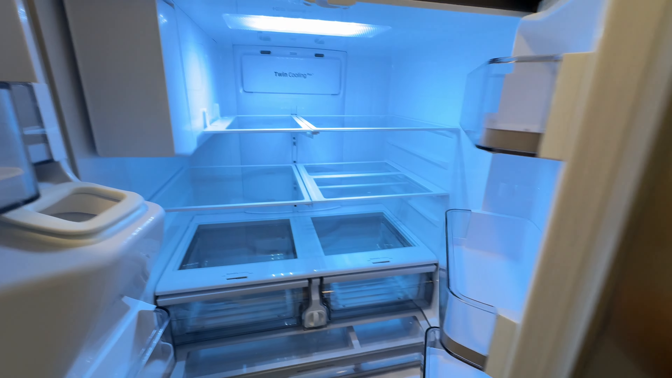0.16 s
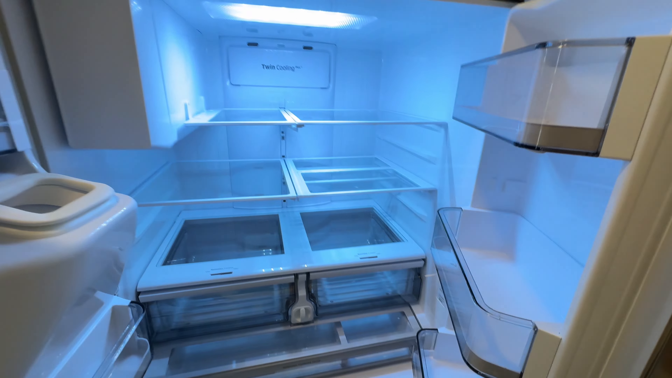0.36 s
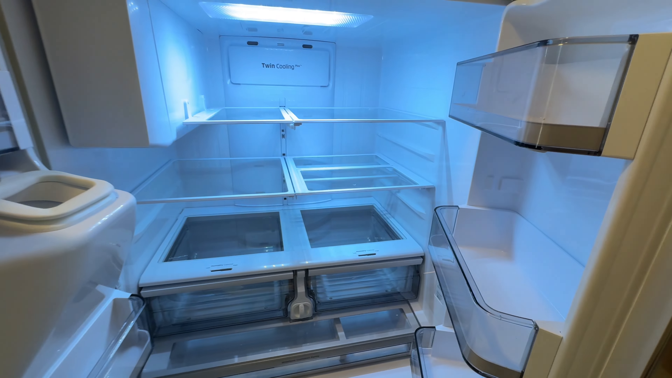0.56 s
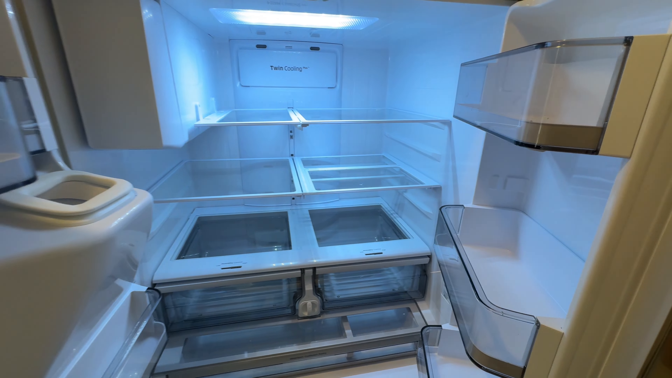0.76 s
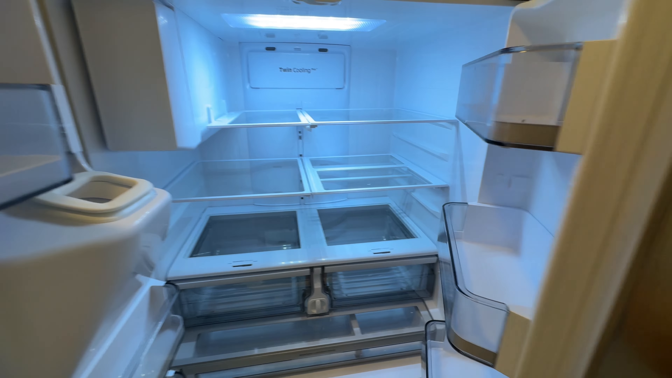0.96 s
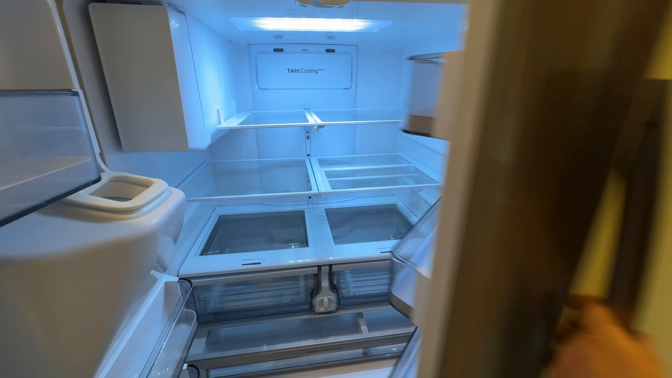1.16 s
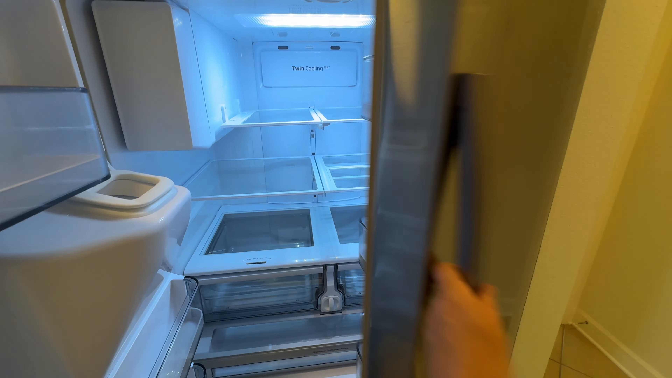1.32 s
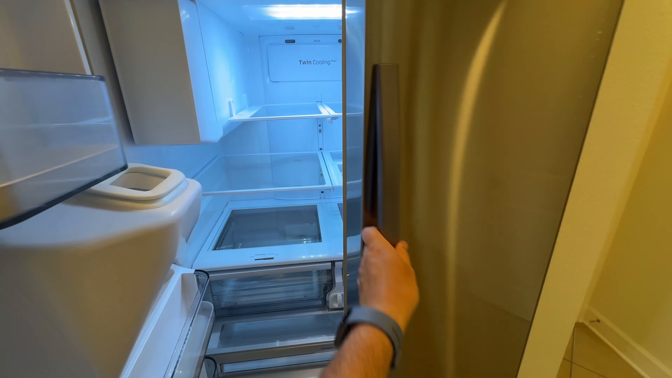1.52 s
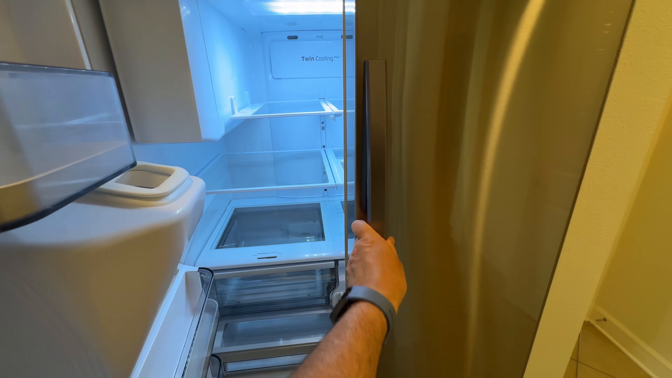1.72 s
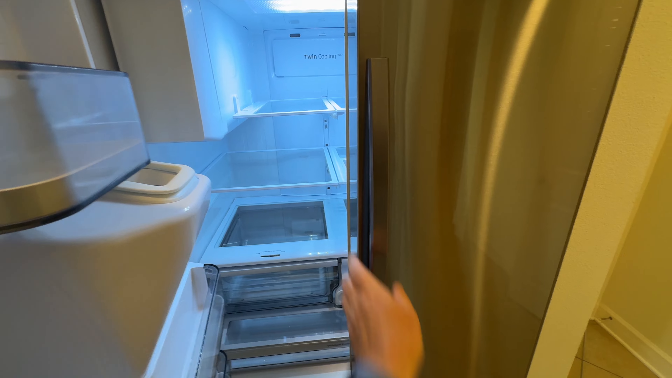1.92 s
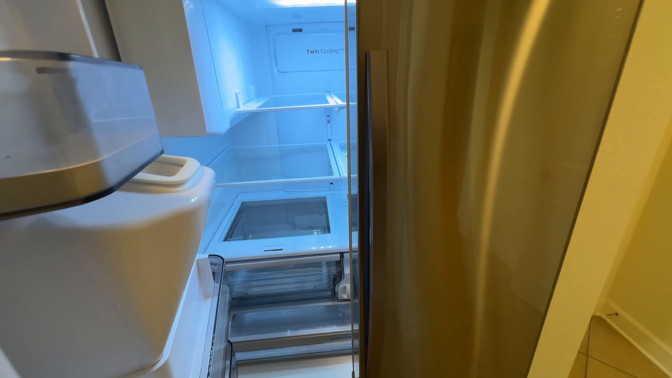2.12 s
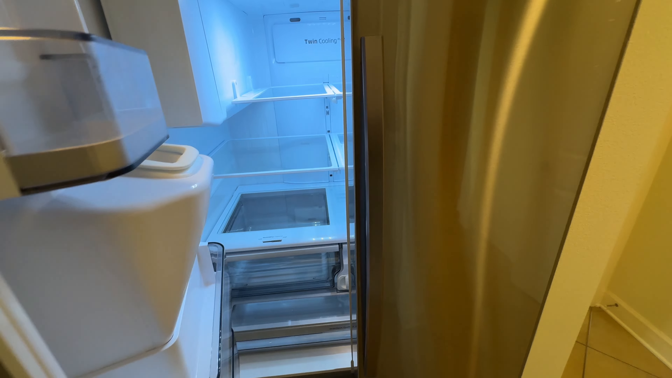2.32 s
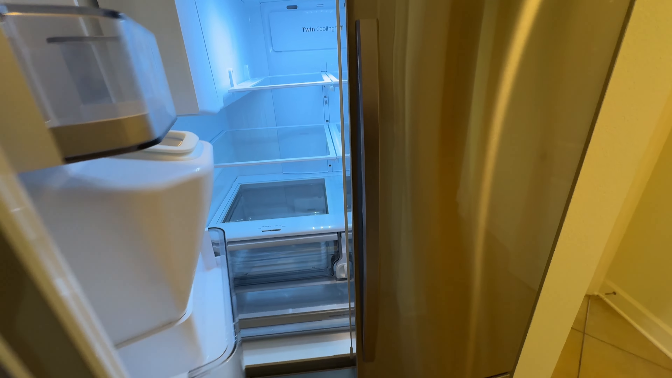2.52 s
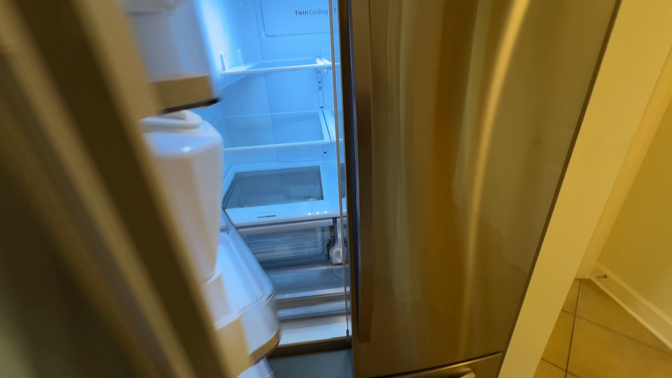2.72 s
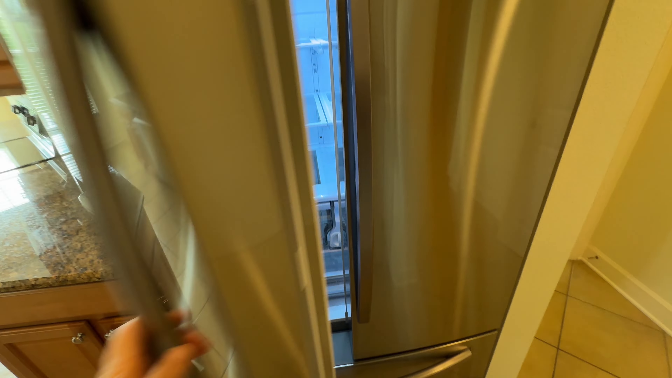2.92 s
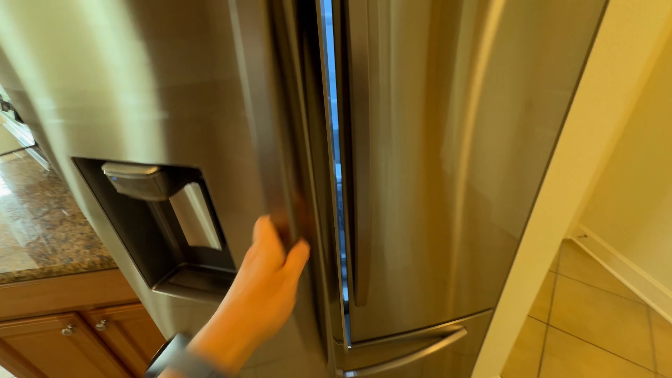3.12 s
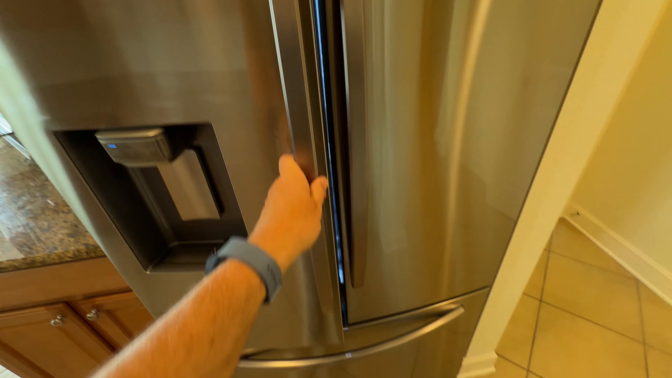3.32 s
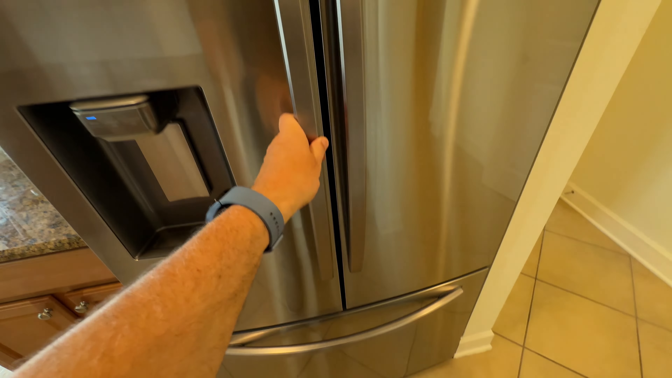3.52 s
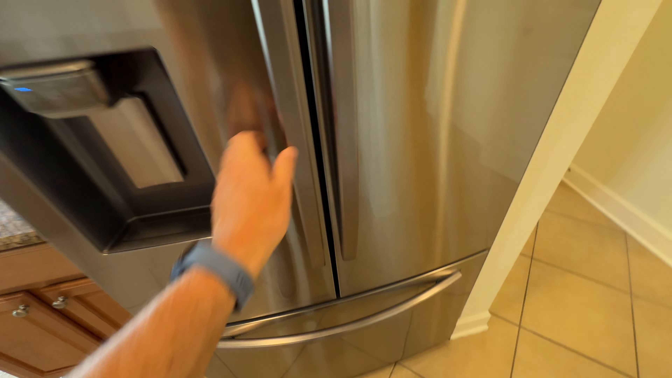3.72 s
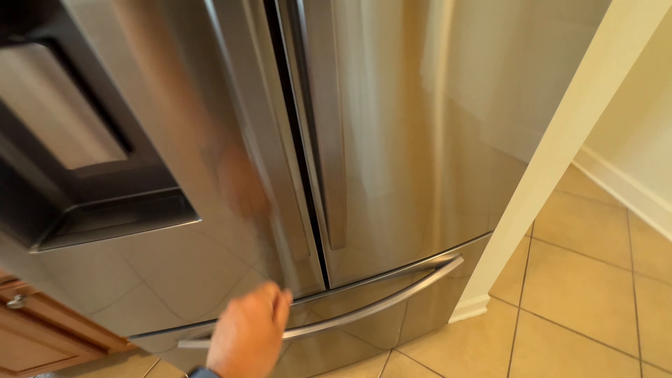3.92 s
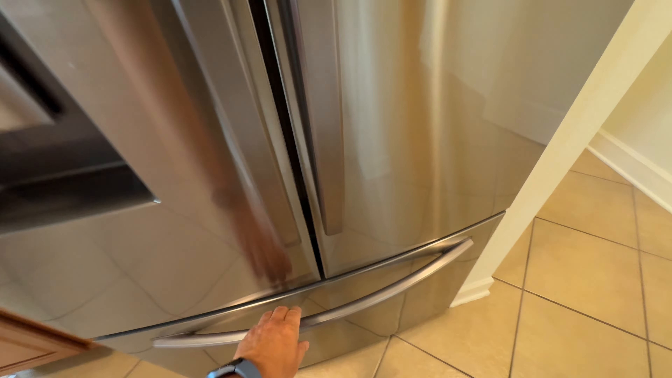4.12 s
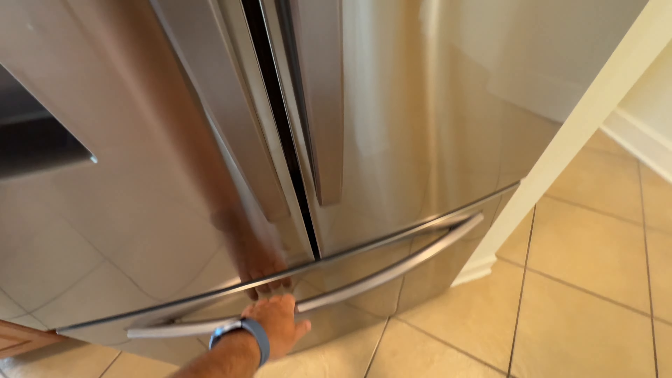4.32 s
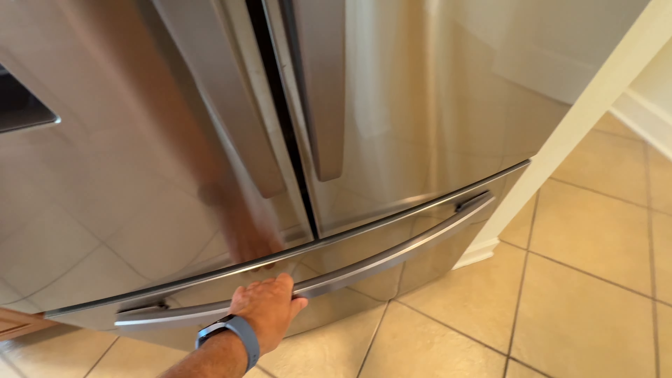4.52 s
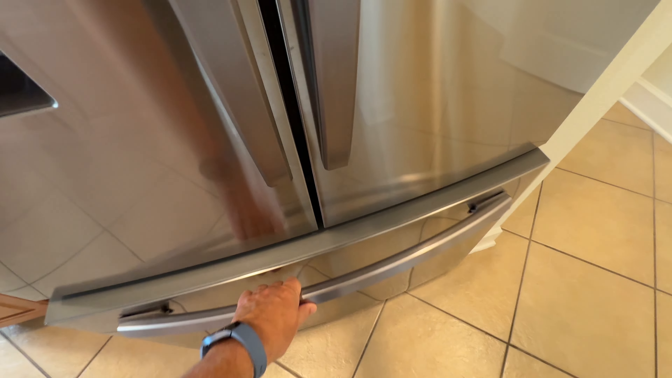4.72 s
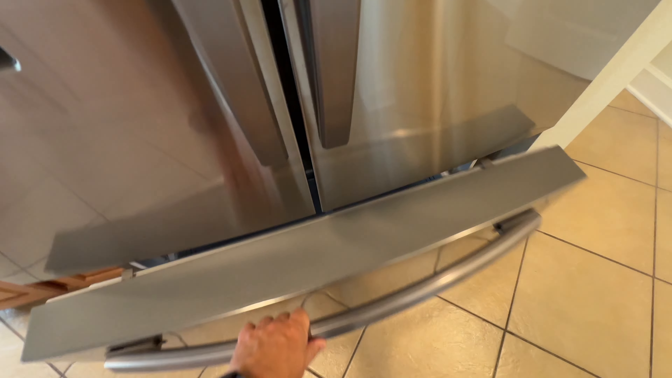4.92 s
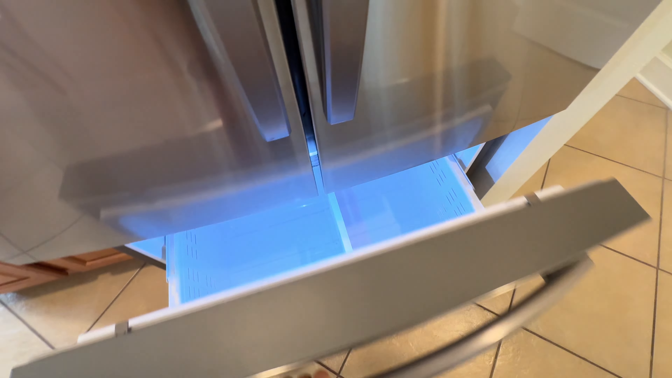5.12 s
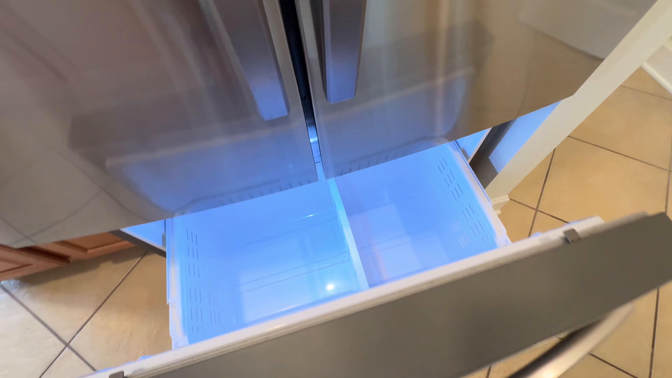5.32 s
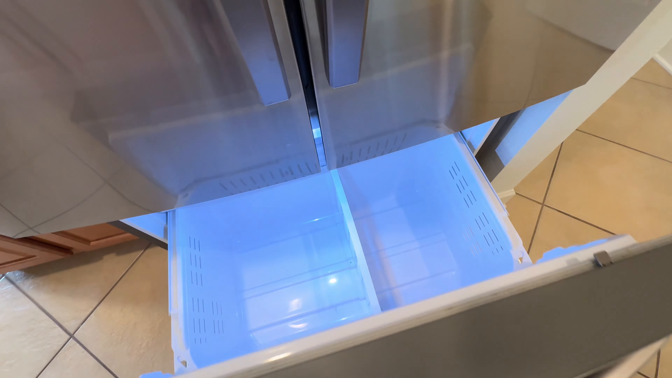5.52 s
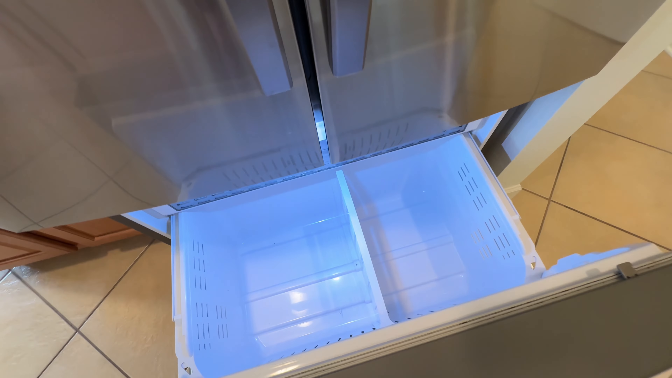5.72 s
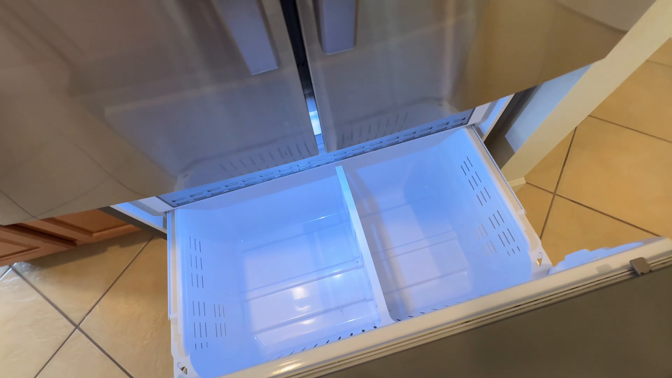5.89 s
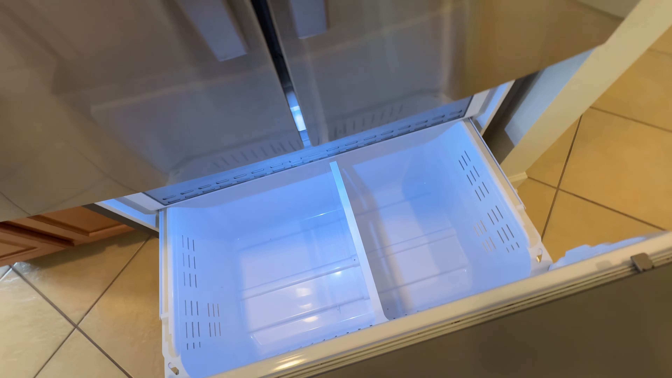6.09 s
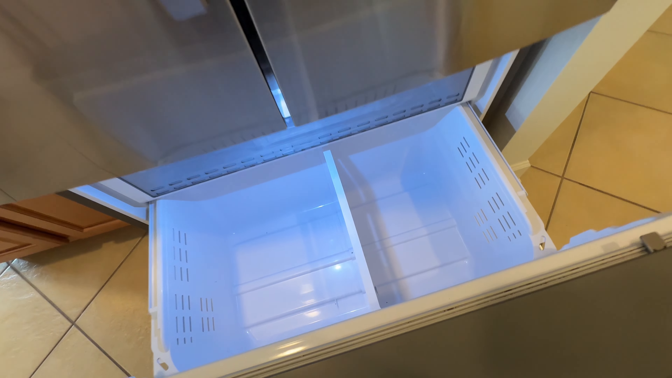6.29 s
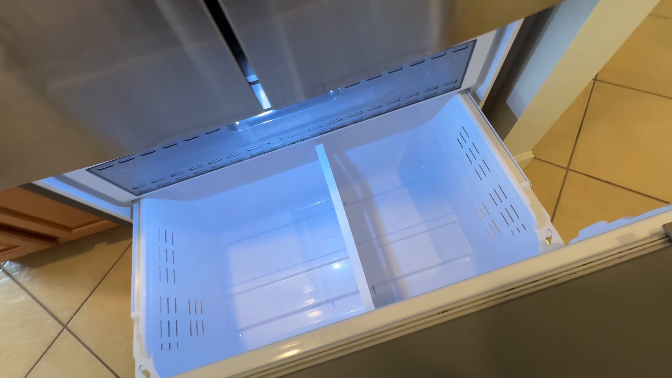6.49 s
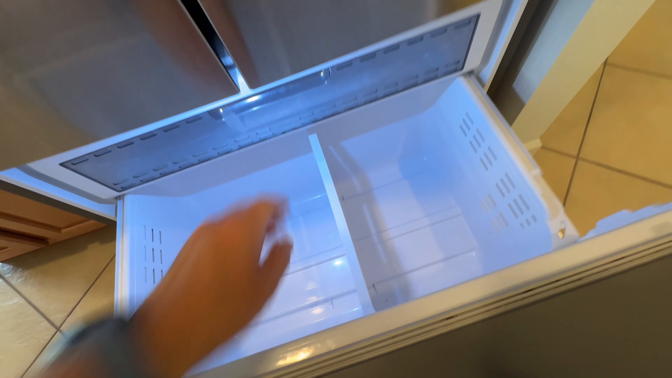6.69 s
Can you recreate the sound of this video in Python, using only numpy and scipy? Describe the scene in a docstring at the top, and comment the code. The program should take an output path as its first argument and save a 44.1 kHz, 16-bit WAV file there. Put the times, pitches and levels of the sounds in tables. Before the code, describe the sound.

Close stereo pickup in a lightly echoing tiled kitchen with low compressor hum. A faint thin hinge squeak leads to a gasketed fridge door thumping shut with a deep boom. A second door clacks, its plastic bins ringing. After small handling knocks, a freezer drawer peels off its seal, grinds and rumbles outward with chattering bins, bangs on its stop, shudders, clicks, and drops a tray with a hollow clunk.

```python
"""A refrigerator in a tiled kitchen: a hinge squeaks thinly, one door thumps on its gasket, a second clacks.
Then the freezer drawer peels off its seal, grinds and rolls out with chattering bins and bangs on its stop.
It shudders to rest; a runner clicks and a tray drops. Hum, room air and moving air lie underneath.
Blows are short bursts of coloured noise, ringing parts are fading sines, and rolling is noise from
crowds of tiny collisions that follow the drawer's speed. The room adds a fading noise tail."""
import sys
import numpy as np
from scipy import signal
from scipy.fft import rfft, irfft, next_fast_len
from scipy.io import wavfile
from scipy.ndimage import map_coordinates

SR = 44100
rng = np.random.default_rng(int(sys.argv[2]) if len(sys.argv) > 2 else 0)


def wav_record(signal):
    """Record a signal, one row per channel, as 16-bit PCM in the file named by sys.argv[1]."""
    frames = np.transpose(np.atleast_2d(signal))
    bounded = np.clip(frames, -1, 1)
    # unit amplitude maps onto the largest positive 16-bit level
    quanta = np.round(bounded * 32767).astype(np.int16)
    wavfile.write(sys.argv[1], SR, quanta)


N = 297675

# Hard contacts as the drawer meets its stop: start_s, level_db, rise_s, t60_s, tilt_db_per_octave
STOP_CONTACTS = [(5.2914, -18, 0.0027, 0.11, 1), (5.302, -18.5, 0.0022, 0.075, 0.13),
                 (5.315, -18.5, 0.0025, 0.32, -1.1)]
# Colour of the rolling runners: pitch_hz, level_db_per_hz
RUNNER_COLOUR = [(160, -29), (280, 2), (355, -0.5), (534, -1.5), (850, -3.5), (1400, -11), (1860, -16),
                 (2020, -32), (3000, -31), (3900, -59), (6600, -120)]
# Colour of the chattering bin rims and crackling rubber: pitch_hz, level_db_per_hz
CHATTER_COLOUR = [(1120, -5.5), (2000, -9), (3110, -11), (8260, -19.5), (10100, -20), (11900, -29),
                  (15000, -21)]
# Colour of bright clicks and dry hiss: pitch_hz, level_db_per_hz
CLICK_COLOUR = [(400, -16), (2500, 2.5), (9500, -2.5), (15000, -9)]
# How alike left and right are: pitch_hz, likeness (1 = the same, 0 = unrelated)
LIKENESS = [(60, 0.95), (130, 0.92), (290, 0.75), (640, 0.19), (1400, 0.11), (2400, -0.18), (4500, 0.044),
            (9000, -0.003), (12000, -0.34)]

PEEL_S = 4.388  # the drawer's gasket starts to leave the cabinet
STOP_S = STOP_CONTACTS[0][0]  # the drawer meets its end stop


def amp(db):
    """Turn decibels into gain."""
    return 10 ** (np.asarray(db) / 20)


def unit(x):
    """Scale to an average strength (rms) of 1."""
    return x / np.sqrt(np.mean(x ** 2) + 1e-20)


def burst(x):
    """Scale a short sound to the energy of a hundredth of a second at rms 1."""
    return unit(x) * np.sqrt(SR / 100 / x.shape[-1])


def along(points, hz):
    """Read a curve of (Hz, value) points, joined by lines on a log pitch axis."""
    point_hz, values = np.transpose(points)
    return np.interp(np.log(hz + 1), np.log(point_hz + 1), values)


def curves(rows):
    """Join timed rows into one value per sample for each column after the time."""
    s, *columns = np.transpose(rows)
    return [np.interp(np.arange(N) / SR, s, column) for column in columns]


def wobble(rate):
    """A smooth random curve with this many random points a second."""
    points = rng.standard_normal(int(N * rate / SR) + 4)
    return map_coordinates(points, [np.arange(N) * rate / SR])


def fade(t, t60):
    """Free decay that loses 60 dB in t60 seconds."""
    return np.exp(-np.log(1000) * t / t60)


def envelope(s, rise, hold, t60):
    """Straight attack from time s, full level until s + hold, then free decay."""
    t = np.arange(N) / SR - s
    return np.clip(t / rise, 0, 1) * fade(np.maximum(t - hold, 0), t60)


def swells(rows):
    """Add up smooth bell-shaped gains given as (s, half length s, dB)."""
    t = np.arange(N) / SR
    return sum(amp(db) * np.exp(-((t - s) / length) ** 2 / 2) for s, length, db in rows)


def add(out, s, x):
    """Mix x into out at time s, cut off at the end."""
    part = out[:, round(s * SR):][:, :x.shape[-1]]
    part += x[..., :part.shape[-1]]


def filtered(x, response):
    """Multiply the spectrum of x by a response that depends on frequency."""
    n = x.shape[-1]
    m = next_fast_len(n + SR // 4)  # padded so that the end does not wrap onto the start
    return irfft(rfft(x, m) * response(np.fft.rfftfreq(m, 1 / SR)), m)[..., :n]


def causal(x, colour_db):
    """Colour a short sound so that nothing comes before its attack (minimum phase)."""
    n = x.shape[-1]
    cepstrum = irfft(np.log(amp(colour_db(np.fft.rfftfreq(n, 1 / SR)))), n)
    cepstrum[1:n // 2] *= 2
    cepstrum[n // 2 + 1:] = 0
    return irfft(rfft(x) * np.exp(rfft(cepstrum)), n)


def resonances(modes, f):
    """Response of a body with (Hz, width Hz, dB) modes, added with alternating signs."""
    total = 0
    for k, (centre, width, db) in enumerate(modes):
        damping = 1j * f * width
        total = total + (-1) ** k * amp(db) * damping / (centre * centre - f * f + damping)
    return total


def stereo_angle(hz):
    """Half the angle between left and right that gives them their likeness."""
    return np.arccos(np.clip(along(LIKENESS, hz), -1, 1)) / 2


def spread(pair):
    """Turn two unrelated signals into left and right: alike in the bass, mostly unrelated in the treble."""
    mid, side = filtered(pair, lambda hz: np.array([np.cos(stereo_angle(hz)), np.sin(stereo_angle(hz))]))
    return np.array([mid + side, mid - side])


def shaped(pair, spectrum):
    """Stereo sound of rms 1 with the given colour."""
    return unit(spread(filtered(pair, lambda hz: amp(along(spectrum, hz)))))


def contact(colour_db, rise, t60, size=16384):
    """One blow: countless short-lived panel modes, heard as a dying crack of noise."""
    t = np.arange(size) / SR
    crack = rng.standard_normal((2, size)) * (1 - np.exp(-t / rise)) * fade(t, t60)
    return burst(spread(causal(crack, colour_db)))


def hollow(pitch_hz, octaves, rise, t60):
    """A contact whose colour is one broad hump about a pitch."""
    def hump_db(hz):
        distance = np.log2((hz + 1) / pitch_hz) / octaves
        return -24 * np.log10(1 + distance ** 4 / 2)
    return contact(hump_db, rise, t60)


def ring(modes, rise=0.0052):
    """Fading sines of (Hz, dB, t60 s) modes; left and right get further out of step in the treble."""
    t = np.arange(SR // 2) / SR
    out = np.zeros((2, len(t)))
    for hz, db, t60 in modes:
        skew = stereo_angle(hz) * rng.choice([-1, 1]) * np.array([[1], [-1]])
        out += amp(db) * fade(t, t60) * np.sin(2 * np.pi * (hz * t + rng.random()) + skew)
    return burst(out * (1 - np.exp(-t / rise)))


def thump(s, modes, rise):
    """Each (Hz, dB, t60 s, lag s) mode of a heavy mass starts to swing its lag after the blow."""
    out, t = np.zeros((2, N)), np.arange(SR) / SR
    for hz, db, t60, lag in modes:
        swing = np.sin(2 * np.pi * hz * t) * fade(t, t60) * (1 - np.exp(-t / rise))
        add(out, s + lag, amp(db) * swing)
    return out


def impact(contacts, colour, wet_db, ripple_db):
    """A quick run of contacts on one object; each has its own tilt and fills the room with its colour."""
    out = np.zeros((2, N))
    # the object's crowded modes ripple its colour in the same way for every contact
    modes_hz = np.geomspace(400, 16000, num=170)
    ripple = ripple_db * np.clip(rng.standard_normal(len(modes_hz)), -2, 2)
    for s, db, rise, t60, tilt_db in contacts:
        def colour_db(hz):
            tilt = tilt_db * np.log2(np.maximum(hz, 200) / 1000)
            return along(colour, hz) + np.interp(hz, modes_hz, ripple, left=0) + tilt
        add(out, s, amp(db) * contact(colour_db, rise, t60))
        add(out, s + rise, amp(db + wet_db) * burst(causal(room_tail(), colour_db)))
    return out


def ticks(rate, scatter_db, t60):
    """Random little collisions of uneven size, rate per second, each a short crackle of noise."""
    blows = (rng.random(N) < rate / SR) * amp(scatter_db * np.clip(rng.standard_normal(N), -2, 2))
    energy = signal.fftconvolve(blows ** 2, fade(np.arange(SR // 4) / SR, t60) ** 2)[:N]
    return unit(np.sqrt(np.abs(energy)) * rng.standard_normal((2, N)))


def fuzzy_tone(hz, width_hz):
    """A rough friction tone of rms 1: a sine on a pitch curve, blurred by random wobbles."""
    phase = 2 * np.pi * np.cumsum(hz) / SR
    return unit(wobble(width_hz) * np.cos(phase) + wobble(width_hz) * np.sin(phase))


def right_door():
    """The gasket slaps shut, the catch pings and the whole cabinet booms."""
    # Hard contacts: start_s, level_db, rise_s, t60_s, tilt_db_per_octave
    door_contacts = [(1.6239, -33, 0.0009, 0.01, -1.5), (1.6263, -20.5, .001, 0.026, 1),
                     (1.6312, -19, 0.00137, 0.063, -5), (1.637, -24.5, 0.0019, 0.13, 0.5)]
    # Colour of the gasket's slap: pitch_hz, level_db_per_hz
    gasket_colour = [(60, -12.5), (200, 1.5), (340, -1), (500, -2), (900, -1.5), (1400, -0.5), (2400, -7),
                     (3500, -8), (4300, -5.5), (5000, -5), (5800, -9.5), (7500, -14.5), (9500, -10.5),
                     (15000, -17)]
    # The cabinet's slow swinging: pitch_hz, level_db, t60_s, lag_s
    cabinet_modes = [(56, -11, 0.51, 0.023), (62.1, -27.5, 0.55, 0.027), (130.4, -11.5, 0.17, 0.01),
                     (111.3, -27, 0.55, 0.0211), (226, -31.5, 0.31, 0.0046), (332, -38.5, 0.1, 0.0053)]
    # The closing catch's brief ring: pitch_hz, level_db (among the modes), t60_s
    catch_modes = [(3660, -15, 0.026), (4485, -7.5, 0.053), (4790, -2.5, 0.04), (5020, -4, .04),
                   (5400, -15, .04)]
    out = impact(door_contacts, gasket_colour, wet_db=-4.0, ripple_db=3.0)
    out += thump(door_contacts[0][0], cabinet_modes, rise=0.0063)
    add(out, door_contacts[1][0], amp(-24) * ring(catch_modes, rise=0.00066))
    return out


def left_door():
    """The flap between the doors snaps over and sets the door bins ringing."""
    # Hard contacts: start_s, level_db, rise_s, t60_s, tilt_db_per_octave
    door_contacts = [(3.331, -26, 0.0082, 0.037, 0.73), (3.340, -19, 0.0035, 0.042, -0.11),
                     (3.351, -22.5, .003, 0.056, -0.36), (3.373, -36, 0.0018, 0.059, -0.92)]
    # Colour of the flap: pitch_hz, level_db_per_hz
    flap_colour = [(40, -14.5), (80, 0.5), (250, -2.5), (330, -9), (420, 0.5), (600, -8), (1350, -1),
                   (1900, -0.5), (2300, 2), (3500, -5), (5000, -11), (7500, -16), (9600, -10), (15000, -26)]
    # Plastic door bins ringing on: pitch_hz, level_db (among the modes), t60_s
    door_bin_modes = [(237, 0, 0.29), (409.5, 7.5, 0.19), (1120, 3, 0.35), (1295, 9.5, 0.28),
                      (1420, -7, 0.23), (1510, 14, 0.13), (1670, -1, 0.21), (2120, -24, 0.16),
                      (2370, -5, 0.22), (2740, 5, 0.2), (3200, -3, 0.2)]
    out = impact(door_contacts, flap_colour, wet_db=-1.0, ripple_db=2.5)
    add(out, door_contacts[1][0], amp(-22.5) * ring(door_bin_modes))
    return out


def seal():
    """The drawer's gasket peels away: rubber crackles and the front panel's hollow body answers."""
    body = amp(-47) * shaped(ticks(210, 2.9, 0.0099), RUNNER_COLOUR)
    crackle = amp(-44) * shaped(ticks(200, 3.9, 0.075), CHATTER_COLOUR)
    return envelope(PEEL_S, rise=0.019, hold=0.22, t60=0.64) * (body + crackle)


def drawer_speed():
    """The drawer jerks free, drags, gathers pace, then loses its speed quickly after the end stop."""
    # Speed before the gate below: time_s, share_of_full_speed
    speed_points = [(4.4, 0), (4.49, 0.42), (4.57, .13), (4.7, .14), (4.8, .25), (4.89, 0.52), (5.02, 1),
                    (5.24, 0.93), (5.28, 0.6), (5.32, 0.54)]
    gate = envelope(PEEL_S, rise=0.019, hold=STOP_S - PEEL_S, t60=0.11)
    return np.maximum(curves(speed_points)[0], 0) * gate


def shudder(db, t60):
    """Shaking left in a loose part by the end stop."""
    return amp(db) * envelope(STOP_S, rise=0.024, hold=0, t60=t60)


def drawer():
    """Rollers jolt over their tracks, harder with speed: the tub booms, the bins ring and their rims chatter."""
    # The hollow tub, before its bass and treble cuts: pitch_hz, width_hz, level_db
    tub_modes = [(70, 23, 4.5), (132, 34, -3.5), (175, 34, 0), (269, 16, -13.5)]
    # The plastic bins, before their treble cut: pitch_hz, width_hz, level_db
    bin_modes = [(356, 29, 0.5), (436, 27, -4.5), (577, 71, -7), (713, 22, -3), (780, 38, -9),
                 (918, 12, -6.5), (1066, 29, -13), (1320, 120, -16)]
    speed, t = drawer_speed(), np.arange(N) / SR
    extended = np.clip((t - 4.995) / .01, 0, 1)  # the inner rails have run out: more chatter
    loose = np.clip(1 - (t - 5.83) / 0.076, 0, 1)  # bins and rims stop shaking at rest

    def tub_response(hz):
        bass_cut = hz ** 4 / (hz ** 4 + 52 ** 4)
        return resonances(tub_modes, hz) * bass_cut / (1 + (hz / 400) ** 4)

    def bin_response(hz):
        return resonances(bin_modes, hz) / (1 + (hz / 2500) ** 4)

    tub = unit(spread(filtered(ticks(420, 2.8, 0.026), tub_response)))
    bins = unit(spread(filtered(ticks(340, 3.2, .02), bin_response)))
    runner = unit(shaped(ticks(520, 2.5, 0.018), RUNNER_COLOUR) + amp(-0.5) * bins)
    chatter = shaped(ticks(300, 3.5, 0.12), CHATTER_COLOUR)
    jolts = unit(amp(2.4 * wobble(28)))  # bumps in the track shake bins and rims together
    # each layer: level in dB at full speed, growing as a power of the speed, plus shudder
    boom = tub * (amp(-28.5) * speed ** 0.98 + shudder(db=-33, t60=2.87))
    rattle = runner * (amp(-29.5) * speed ** 0.83 + loose * shudder(db=-34.5, t60=2.18))
    rim_level = amp(-47.5 + 8 * extended) * speed ** 0.72
    rims = chatter * (rim_level + loose * shudder(db=-52, t60=2.0))
    return boom + jolts * (rattle + rims)


def grinding(size=11025):
    """The runners stick and slip in short surges: uneven slips ring them, each surge at its own pitch."""
    # Surges (level is scaled by the length): start_s, length_s, level_db, slips_per_s, pitch_ratio
    surges = [(4.429, 0.03, -32, 240, 1.01), (4.48, 0.055, -51, 190, 0.77), (4.613, 0.03, -51, 200, .96),
              (4.73, .025, -44, 200, 1.06), (4.835, 0.057, -43.5, 150, 0.98),
              (4.892, 0.063, -40.5, 240, 1.03), (4.955, 0.023, -33, 190, 1.01),
              (4.994, 0.028, -26.5, 230, 1.08), (5.092, 0.11, -33.5, 210, 1.3),
              (5.191, 0.064, -35.5, 180, 1.3)]
    # Ringing of the runners, before pitch ratio and treble cut: pitch_hz, width_hz, level_db
    grind_modes = [(518, 66, -1.5), (704, 68, -1.5), (925, 65, 0), (1370, 200, -10), (2100, 440, -10)]
    out, t = np.zeros((2, N)), np.arange(size) / SR
    for s, length, db, rate, ratio in surges:
        gaps, sizes = rng.standard_normal(size=(2, 60))
        when = np.cumsum(np.exp(.25 * gaps)) / rate  # uneven gaps between slips
        places = ((when - when[0]) * SR).astype(int)
        slips = np.bincount(places, amp(1.5 * sizes), minlength=len(t))[:len(t)]
        slips *= np.minimum(t / 0.0098, 1) * fade(np.maximum(t - length, 0), t60=0.11)
        grit = signal.fftconvolve(slips, fade(t, 0.014))[:len(t)] * rng.standard_normal((2, len(t)))
        response = lambda hz: resonances(grind_modes, hz / ratio) / (1 + (hz / 3500) ** 4)
        surge = spread(filtered(grit, response))
        add(out, s, amp(db) * unit(surge) * np.sqrt(length / t[-1]))
    return out


def rails():
    """The rollers whirr higher with speed; the steel rails ring and hiss where a roller drags."""
    # Ringing of the steel rails: pitch_hz, width_hz, level_db
    rail_modes = [(1995, 380, 2), (2430, 300, -2.5), (3370, 450, -7), (4160, 330, -4), (4680, 470, -9.5),
                  (5960, 370, -7.5)]
    # A roller drags on its rail: start_s, length_s, level_db
    scrapes = [(4.455, 0.017, -43), (4.612, 0.025, -45), (4.734, 0.022, -50.5), (4.806, 0.026, -51),
               (4.982, 0.02, -44.5), (5.104, 0.038, -36.5), (5.2, 0.041, -54.5)]
    speed = drawer_speed()
    whirr_hz = 1043 * speed ** .13
    whirr = spread(np.array([fuzzy_tone(whirr_hz, width_hz=130) for port in range(2)]))
    steel = unit(spread(filtered(ticks(520, 3.2, 0.0092), lambda hz: resonances(rail_modes, hz))))
    hiss = shaped(ticks(400, 3, 0.011), CLICK_COLOUR)
    drag = sum(amp(db) * envelope(s, 0.0084, length, t60=0.09) for s, length, db in scrapes)
    ringing = steel * (amp(-46) * speed ** 1.23 + drag)
    return amp(-42) * speed * whirr + ringing + amp(-9) * drag * hiss


def big_bin():
    """Each jolt of the track knocks the big bin in its frame, which rings briefly."""
    # Jolts: start_s, level_db
    bumps = [(4.485, -37), (4.516, -39), (4.594, -36), (4.62, -31.5), (4.73, -37.5), (4.794, -30),
             (4.826, -31.5), (4.868, -33), (4.961, -28), (5.087, -28)]
    # Ringing of the bin: pitch_hz, level_db (among the modes), t60_s
    big_bin_modes = [(355.7, -1.5, 0.21), (431, -5.5, 0.13), (686, -7, 0.084), (922, -11.5, 0.15),
                     (1500, -11, 0.087)]
    out = np.zeros((2, N))
    for s, db in bumps:
        add(out, s, amp(db) * ring(big_bin_modes))
    return out


def end_stop():
    """The runners hit their stops and the heavy drawer front swings."""
    # Colour of the stop: pitch_hz, level_db_per_hz
    stop_colour = [(100, -32.5), (330, 14.5), (500, -2), (1000, -4.5), (1800, -4.5), (3000, -11),
                   (6500, -15), (9500, -15), (15000, -16.5)]
    # Swinging of the drawer front: pitch_hz, level_db, t60_s, lag_s
    front_modes = [(73.5, -39, 0.48, 0.018), (128, -17.5, 0.17, 0.0132), (144.6, 0.5, 0.091, 0.0134),
                   (197.6, -13, 0.44, 0.01752), (276.7, -18, 0.31, 0.01342), (350, -19.5, 0.18, 0.01403)]
    bang = impact(STOP_CONTACTS, stop_colour, wet_db=-5, ripple_db=2.5)
    return bang + kitchen(thump(STOP_S, front_modes, rise=0.0044), wet_db=-12.0)


def tray():
    """A runner clicks into its detent; later the inner tray drops into its seat with a hollow clunk."""
    # Ringing of the detent: pitch_hz, level_db (among the modes), t60_s
    latch_modes = [(460, -4, 0.065), (677, 9.5, 0.023), (746, -12, 0.25), (820, -4, 0.042),
                   (976, -13, 0.11), (1430, -11, 0.033)]
    # Ringing of the plastic tray: pitch_hz, level_db (among the modes), t60_s
    tray_modes = [(195, -7, 0.18), (261, -1, 0.1), (404, -7, 0.17), (484, -2, 0.2), (550, -9, 0.15),
                  (697, -1, 0.054), (1080, -5, 0.081), (1230, -6, 0.092), (1390, -15, 0.15)]
    out = np.zeros((2, N))
    add(out, 6.032, amp(-37) * ring(latch_modes, rise=0.00044))
    add(out, 6.624, amp(-26) * ring(tray_modes))
    return kitchen(out, wet_db=-11.5)


def knocks():
    """Soft contacts only thud; hard ones have a hollow body and a bright click."""
    # Dull thuds of hands, gaskets and shifting bins: start_s, level_db, pitch_hz, t60_s
    thuds = [(0.018, -33.5, 74, 0.15), (1.419, -25, 94.8, 0.1), (1.474, -25.5, 60.4, 0.31),
             (3.126, -39.5, 284, 0.11), (3.527, -36, 278, 0.078), (3.552, -31.5, 285, 0.089),
             (4.133, -36.5, 690, 0.031), (4.279, -38, 136, 0.055), (4.465, -38, 170, 0.22),
             (4.599, -30.5, 143, 0.15), (4.872, -28.5, 126, 0.12), (5.019, -25.5, 190, 0.11),
             (5.342, -25.5, 248, 0.067), (5.364, -25.5, 268, 0.054), (5.825, -31, 182, 0.076),
             (5.9, -37.5, 170, 0.19), (6.61, -36, 59.1, 0.55), (6.684, -38.5, 177, 0.12)]
    # Hard plastic knocks of bins, seals and runner catches:
    # start_s, level_db, pitch_hz, width_octaves, t60_s, click_db (relative to level_db)
    hard_knocks = [(0.194, -64.5, 7550, 0.27, 0.018, -16), (1.435, -32.5, 240, 0.41, 0.19, -11),
                   (1.455, -31.5, 935, 0.87, 0.16, -24.5), (1.523, -42.5, 700, 1.33, 0.15, -19),
                   (2.075, -44, 1360, 0.61, 0.039, -17), (2.46, -39, 228, 0.97, 0.24, -41),
                   (3.101, -46.5, 900, 1.13, 0.21, -25), (3.163, -36, 680, 1.01, 0.23, -21.5),
                   (3.508, -43, 950, 0.61, .04, -22), (3.586, -37.5, 790, 0.75, 0.055, -25),
                   (3.621, -43, 596, 0.8, .06, -18), (4.287, -52, 330, 0.77, 0.043, -23),
                   (4.394, -35, 880, 0.73, 0.11, -5.5), (4.417, -31, 1050, 1.1, 0.038, -23),
                   (4.612, -30.5, 326, 0.7, 0.16, -14), (4.815, -35, 700, 1.86, 0.1, -25),
                   (5.642, -46, 689, 1.1, 0.095, -2), (5.655, -43.5, 686, 1.25, 0.1, -4.5),
                   (5.672, -41, 688, 0.95, 0.14, -10), (5.797, -42.5, 997, 1.33, .07, -21),
                   (5.814, -42, 720, 1.25, 0.083, -29), (6.619, -34.5, 1200, 0.5, 0.068, -8.5),
                   (6.624, -36, 1050, 0.4, 0.035, -7.5), (6.638, -44.5, 1310, 0.62, 0.076, -3.5)]
    out = np.zeros((2, N))
    for s, db, pitch_hz, t60 in thuds:
        add(out, s, amp(db) * hollow(pitch_hz, octaves=0.58, rise=0.0015, t60=t60))
    for s, db, pitch_hz, octaves, t60, click_db in hard_knocks:
        click = contact(lambda hz: along(CLICK_COLOUR, hz), rise=0.00095, t60=t60)
        body = hollow(pitch_hz, octaves, rise=0.0011, t60=t60)
        add(out, s, amp(db) * (body + amp(click_db) * click))
    return out


def hinge():
    """The right door's dry hinge squeaks: a thin, faint friction tone of changing pitch."""
    # Path of the squeak: time_s, pitch_hz, level_db
    squeak = [(.19, 8400, -80), (.26, 9000, -80), (.42, 9200, -76), (.52, 9900, -79), (.59, 11500, -72),
              (.67, 10700, -71), (.76, 8600, -77), (.83, 9800, -77), (.93, 9000, -78)]
    hz, db = curves(squeak)
    t = np.arange(N) / SR
    inside_s = np.minimum(t - squeak[0][0], squeak[-1][0] - t)
    moving = np.clip(inside_s / .02 + 1, 0, 1)
    return amp(db) * moving * spread(np.array([fuzzy_tone(hz, width_hz=260) for port in range(2)]))


def movement():
    """Swinging doors push air past the microphone and a gasket rubs on its frame."""
    # A door sweeps through the air: middle_s, half_length_s, level_db
    swings = [(0.1, 0.17, -50.5), (2.66, 0.24, -50.5)]
    # Colour of its draught: pitch_hz, level_db_per_hz
    draught_colour = [(30, -14), (70, -0.5), (200, -4), (400, -10), (1000, -17), (2000, -21), (4000, -26),
                      (9000, -35.5)]
    # The gasket drags just before the right door seats: middle_s, half_length_s, level_db
    rubs = [(1.55, 0.15, -49.5)]
    # Colour of the rub: pitch_hz, level_db_per_hz
    rub_colour = [(300, -2.5), (1400, 1.5), (2500, -14.5), (4500, -14), (6500, -21.5), (12000, -22.5)]
    # The draught buffets mostly the left port: middle_s, half_length_s, level_db (at the left)
    puffs = [(2.47, 0.019, -32.5), (2.59, 0.033, -34.5)]
    # Colour of the buffeting: pitch_hz, level_db_per_hz
    buffet_colour = [(30, -6), (70, -1.5), (120, -1.5), (200, -25), (400, -21), (1500, -36), (5000, -75)]
    draught = swells(swings) * shaped(rng.standard_normal((2, N)), draught_colour)
    rub = swells(rubs) * shaped(ticks(330, 3.0, 0.029), rub_colour)
    buffet = swells(puffs) * shaped(rng.standard_normal((2, N)), buffet_colour)
    return draught + rub + buffet * np.array([[1], [.35]])


def background():
    """The room's slowly drifting air noise and the wavering hum of the compressor."""
    # Colour of the air: pitch_hz, level_db_per_hz
    air_colour = [(20, -3), (35, -11), (58, 2.5), (90, -2.5), (200, -15.5), (260, -15.5), (350, -12.5),
                  (500, -19), (1000, -23.5), (1900, -28), (3000, -36), (8000, -38), (15000, -36.5)]
    t = np.arange(N) / SR
    air = amp(-50 - 1.25 * wobble(1.1)) * shaped(rng.standard_normal((2, N)), air_colour)
    hum = amp(-51.5 + 0.84 * wobble(2.9)) * np.sin(2 * np.pi * 54.0 * t + .5 * wobble(16.0))
    return air + hum


def room_tail():
    """The tiled room's answer and the fainter, longer one of the rooms beyond, as noise fading by pitch."""
    # Decay of the kitchen: pitch_hz, t60_s
    kitchen_decay = [(60, 0.69), (250, 0.47), (1000, 0.38), (2500, 0.36), (5000, 0.39), (9000, 0.31),
                     (12000, 0.04)]
    # Decay of the rooms beyond: pitch_hz, t60_s
    hall_decay = [(100, 1.4), (500, 1.2), (1500, 1.7), (5000, 1.25), (7000, 1.15), (12000, 0.49)]
    hz, t, z = signal.stft(rng.standard_normal((2, SR)), SR, nperseg=256)
    near = fade(t, along(kitchen_decay, hz)[:, None])
    far = amp(-9.5) * fade(t, along(hall_decay, hz)[:, None])
    decay = np.hypot(near, far) * (1 - np.exp(-t / 0.0063))
    tail = spread(signal.istft(z * decay, SR, nperseg=256)[1])
    return tail / np.linalg.norm(tail[0])


def kitchen(x, wet_db):
    """Add the room's stereo answer, excited by the left channel of x, to both channels."""
    return x + amp(wet_db) * signal.fftconvolve(x[:1], room_tail(), axes=1)[:, :N]


def scene():
    """Doors, drawer and small knocks in the kitchen."""
    doors = right_door() + left_door() + hinge()
    rolling = seal() + drawer() + grinding() + rails() + big_bin()
    freezer = kitchen(rolling, wet_db=-6.5) + end_stop() + tray()
    small_knocks = kitchen(knocks(), wet_db=-13)  # close and dry
    return doors + freezer + small_knocks + movement() + background()


def record(dry):
    """Two microphone ports of slightly different colour, a dull top octave and a band limit."""
    # Colour of both ports: pitch_hz, level_db
    microphone_colour = [(22, -2.5), (42, 1), (9900, 1), (10900, -10), (15500, -8)]
    # Difference of the ports: pitch_hz, left_minus_right_db
    port_tilt = [(60, 1.1), (140, 1.5), (1000, 1.35), (2400, -0.5), (3600, 3), (5000, 5), (7000, 4),
                 (9000, 0.5), (14000, -0.5)]

    def ports(hz):
        tilt = along(port_tilt, hz) * np.array([[.5], [-.5]])
        return amp(along(microphone_colour, hz) + tilt) * (hz < 15850)

    return filtered(dry, ports)


dry = scene()
out = record(dry)
wav_record(out)
```